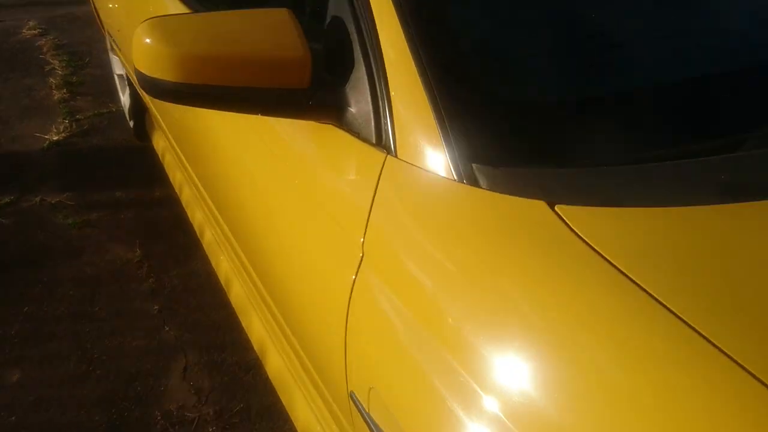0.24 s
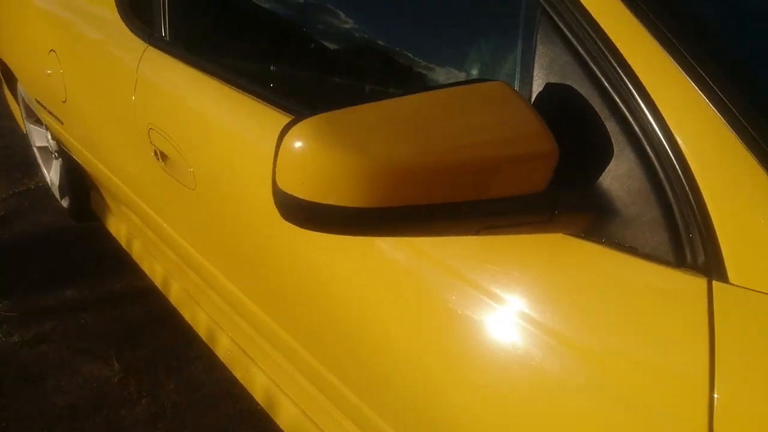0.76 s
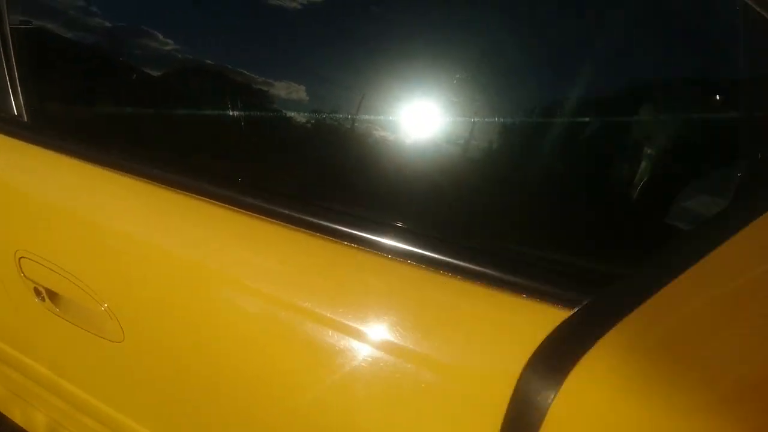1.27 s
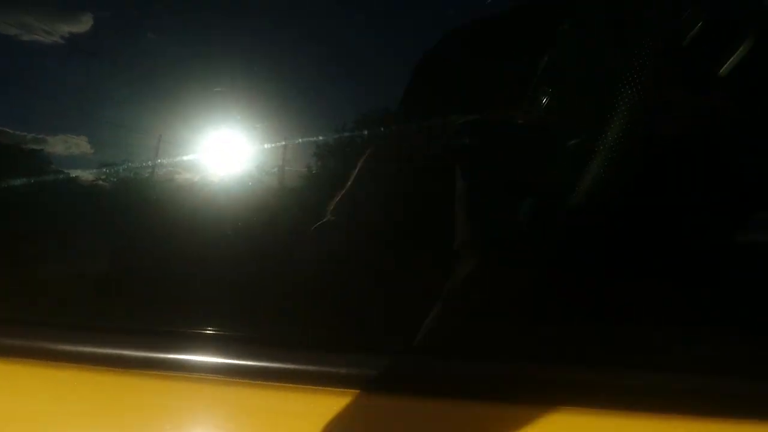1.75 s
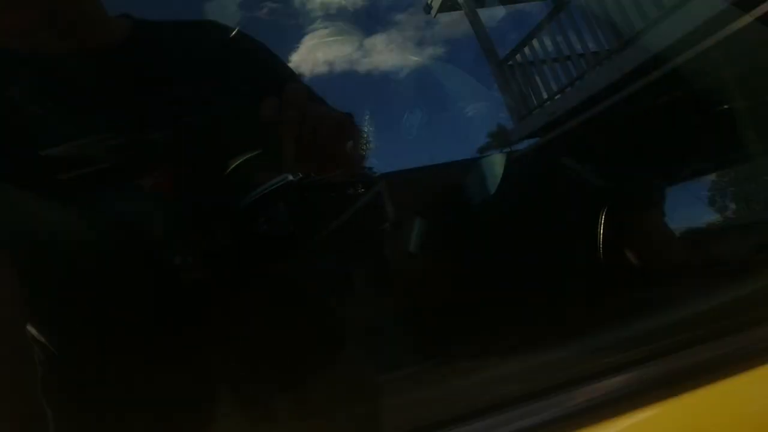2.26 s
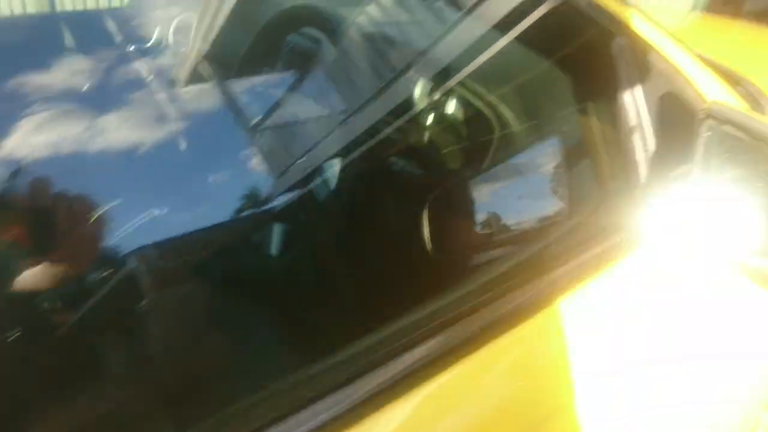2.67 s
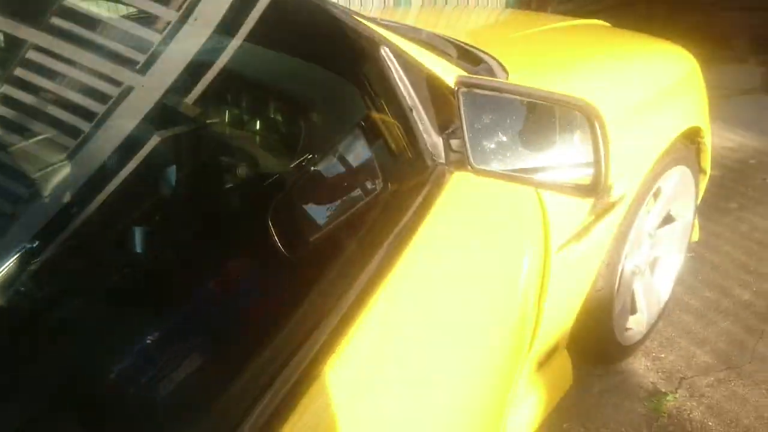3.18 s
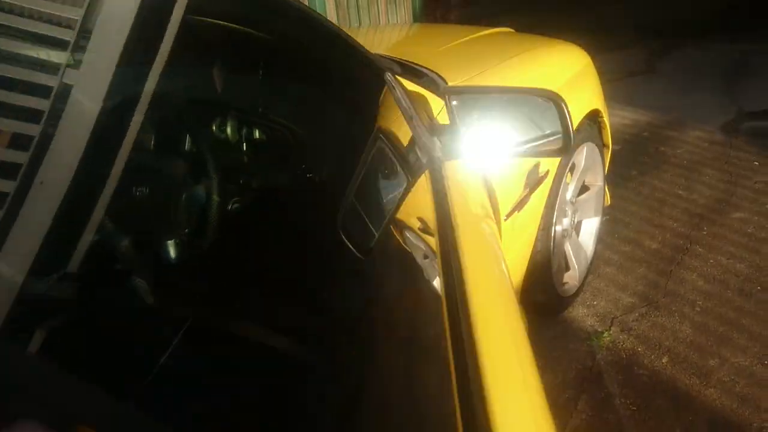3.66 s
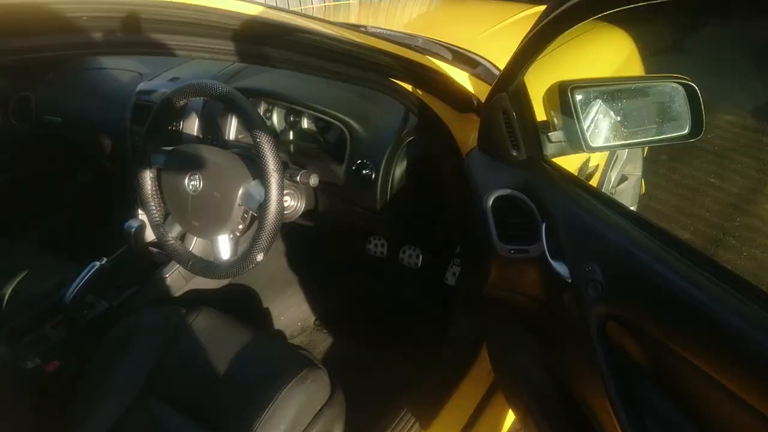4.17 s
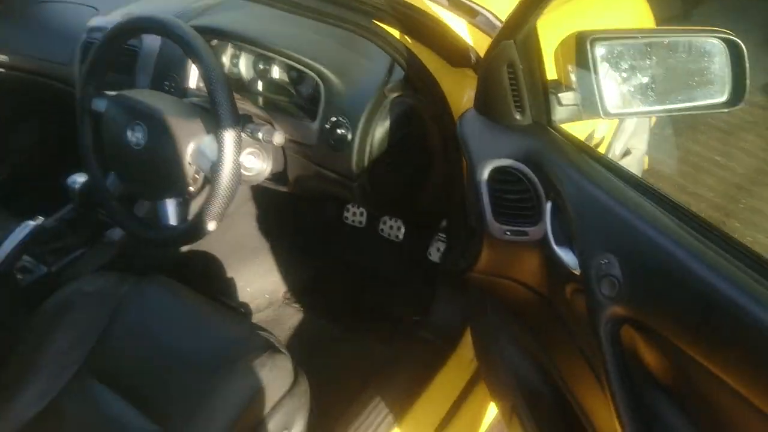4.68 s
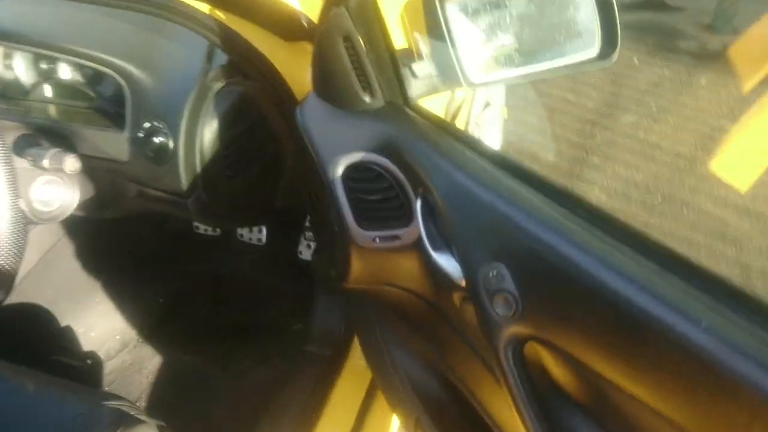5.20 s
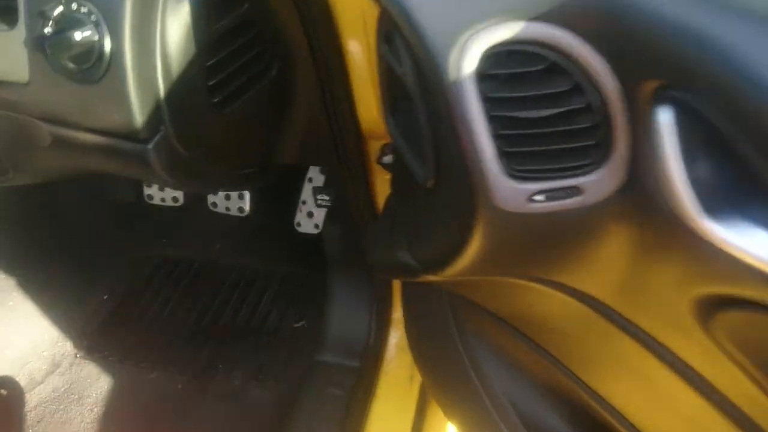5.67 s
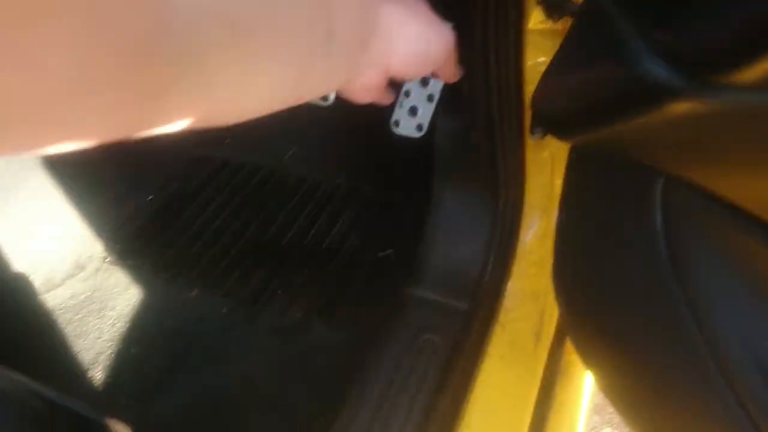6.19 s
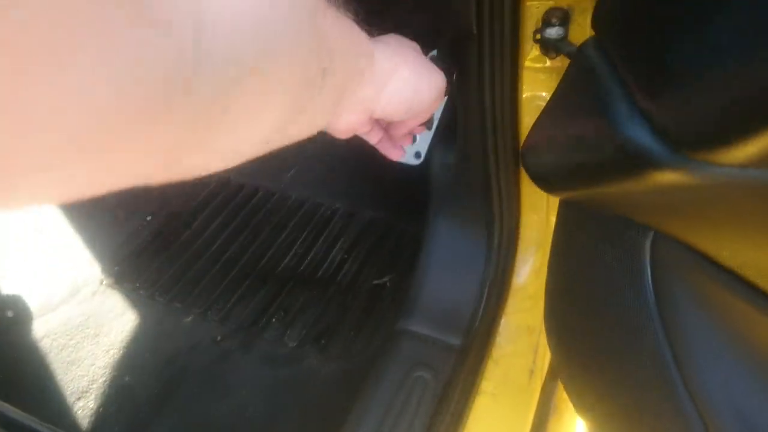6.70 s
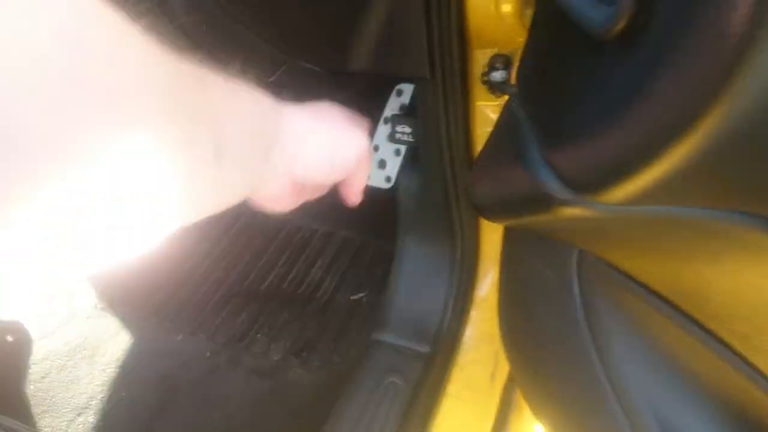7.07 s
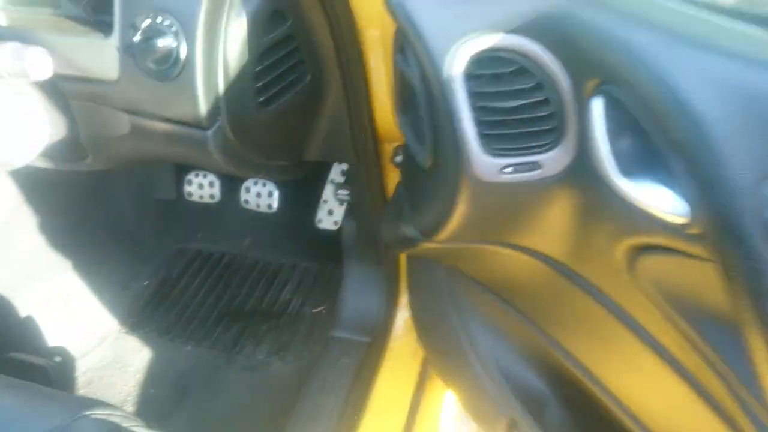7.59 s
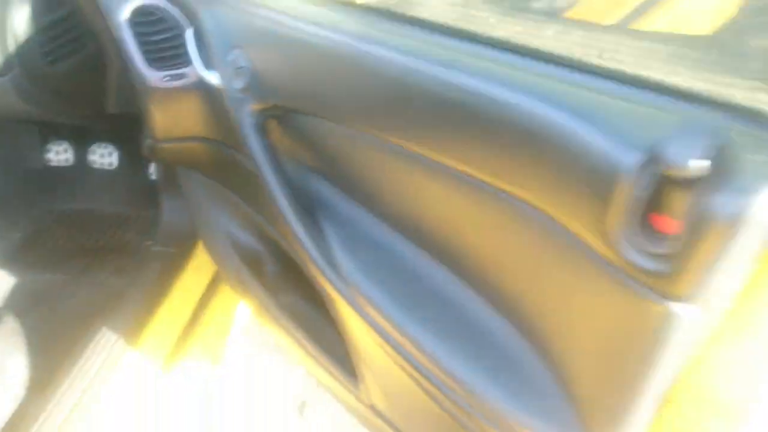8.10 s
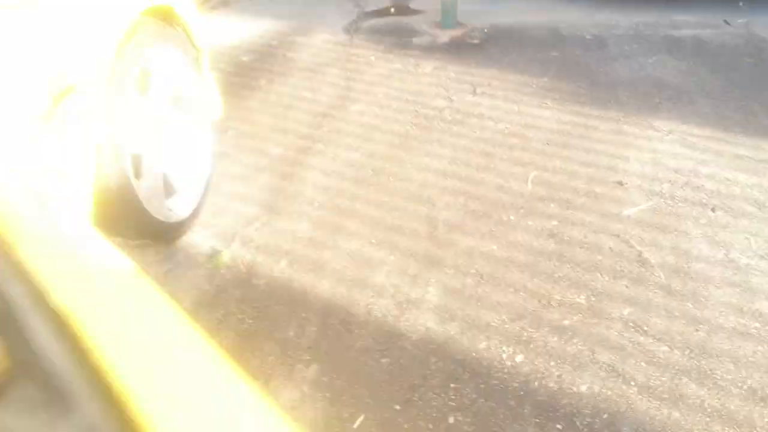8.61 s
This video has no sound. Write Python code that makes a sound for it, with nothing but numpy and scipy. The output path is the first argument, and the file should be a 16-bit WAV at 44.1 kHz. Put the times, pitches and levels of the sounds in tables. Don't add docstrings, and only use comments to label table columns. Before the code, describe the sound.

Faint cloth rustle and distant traffic, a car door unlatching with steel clunks and soft seal squeaks, later a footwell lever snapping and a louder catch crack.

```python
import sys
import numpy as np
from scipy import signal
from scipy.fft import rfft, irfft
from scipy.io import wavfile
from scipy.ndimage import uniform_filter1d

SR = 44100
rng = np.random.default_rng(int(sys.argv[2]) if len(sys.argv) > 2 else 0)


def waveform_to_disk(signal):
    frames = np.transpose(np.atleast_2d(signal))
    scaled = np.clip(frames, -1, 1) * 32767
    samples = np.round(scaled).astype(np.int16)
    wavfile.write(sys.argv[1], SR, samples)


def undo_db(level):
    steps = np.asarray(level, float) / 20
    return 10 ** steps


N = 390285


def evened(x):
    return x / np.sqrt(np.mean(x ** 2) + 1e-20)


def read(points, hz):
    f, value = np.transpose(points)
    return np.interp(np.log(hz + 1), np.log(f + 1), value)


def over_time(points):
    return np.interp(np.arange(N) / SR, *np.transpose(points))


def add(mix, s, sound):
    part = mix[:, round(s * SR):][:, :sound.shape[1]]
    part += sound[:, :part.shape[1]]


def panned(pan_db):
    return undo_db(np.array([pan_db / 2, -pan_db / 2]))


def coloured(x, tone):
    size = x.shape[-1]
    gain = undo_db(read(tone, np.fft.rfftfreq(size, 1 / SR)))
    return evened(irfft(rfft(x) * gain, size))


def pair(size, same):
    a, b = rng.standard_normal((2, size))
    same = np.clip(same, 0, 1)
    return np.array([a, same * a + np.sqrt(1 - same ** 2) * b])


def resonate(x, hz, width):
    turn = np.exp(2j * np.pi * np.cumsum(hz * np.ones(x.shape[-1])) / SR)
    r = np.exp(-np.pi * width / SR)
    return 2 * (turn * signal.lfilter([1 - r], [1, -r], x / turn)).real


def resonate_twice(x, hz, width):
    return resonate(resonate(x, hz, width), hz, width)


def rung(modes, t, spread):
    hz, db, t60 = np.transpose(modes)[:, :, None]
    detune, strength = spread * rng.standard_normal((2, len(modes), 1))
    level = undo_db(db + 30 * strength - 60 * t / t60)
    return -(level * np.sin(2 * np.pi * hz * (1 + detune) * t)).sum(0)


def dying(burst, t, t60, rise):
    shape = undo_db(-60 * t / t60) * np.minimum(t / rise, 1)
    return evened(burst * shape) * np.sqrt(np.mean(shape ** 2))


def ports(x, pan_db):
    paths = np.zeros(24)
    paths[rng.integers(0, 24, size=9)] = rng.choice([-1., 1.], size=9) / 3
    paths = evened(paths - paths.mean()) / 5
    treble = signal.sosfilt(signal.butter(2, 700, "high", fs=SR, output="sos"), x[1])
    side = 1.05 * np.convolve(treble, paths)[:len(treble)]
    return np.array([x[0] + side, x[0] - side]) * panned(pan_db)[:, None]


# (time [s], left over right [dB])
CAMERA_TURN = [
    (3.8, -6),
    (4.15, -4),
    (5.8, -7.5),
    (6.1, -2),
]


def facing(share):
    return panned(share * over_time(CAMERA_TURN))


# (frequency [Hz], level per Hz [dB])
AIR_TONE = [(15, -66), (25, -27), (42, -9.5), (64, -1), (97, -11), (134, -10.5), (236, -15), (270, -16.5),
            (363, -16), (560, -30), (1520, -38.5), (1700, -45), (5880, -39.5), (7710, -42), (16000, -45.5)]
# (frequency [Hz], likeness [0 to 1])
AIR_LIKENESS = [(60, 0.73), (180, 0.86), (550, 0.36), (1650, 0), (15000, 0)]


def air():
    frames, hz = N // 256 + 5, np.fft.rfftfreq(1024, 1 / SR)
    a, b, c, d, patches = rng.standard_normal((frames, 513, 5)).T
    patches = uniform_filter1d(patches, size=12, axis=0)
    patches = evened(uniform_filter1d(patches, size=14, axis=1))
    same = np.clip(read(AIR_LIKENESS, hz), -1, 1)[:, None]
    left = a + 1j * b
    z = np.array([left, same * left + np.sqrt(1 - same ** 2) * (c + 1j * d)])
    z *= undo_db(read(AIR_TONE, hz)[:, None] + 1.9 * patches)
    hush = signal.istft(z, nperseg=1024, noverlap=768)[1][:, :N]
    return undo_db(-55.0) * evened(hush) * facing(0.15)


# (time [s], level [dB])
TRAFFIC_SWELL = [(0.0, -55), (1.1, -52.5), (1.62, -61.5), (2.2, -50), (3.57, -54), (4.19, -56.5),
                 (4.58, -47.5), (4.9, -59), (5.3, -51.5), (5.72, -54), (6.5, -54), (7.76, -61.5),
                 (8.09, -49), (8.4, -66), (8.85, -52)]
# (frequency [Hz], level per Hz [dB])
RUMBLE_COLOUR = [(30, -13.5), (45, -5.5), (65, 7.5), (110, -5.5), (200, -12.5), (400, -25), (600, -62.5)]
# (time [s], level [dB])
ROAR_SWELL = [
    (0.0, -60),
    (3.5, -59),
    (4.15, -51.5),
    (4.65, -60.5),
    (5.3, -54.5),
    (5.8, -67),
    (6.6, -73),
    (7.7, -62.5),
]
# (frequency [Hz], level per Hz [dB])
ROAR_COLOUR = [(110, -39.5), (170, -3), (380, 0.5), (520, -10.5), (1100, -17), (1500, -64.5)]


def traffic():
    low = coloured(pair(N, 0.9), RUMBLE_COLOUR) * undo_db(over_time(TRAFFIC_SWELL) - 1.0)
    roar = coloured(pair(N, 0.59), ROAR_COLOUR) * undo_db(over_time(ROAR_SWELL) - 4.5)
    return (low + roar) * facing(1.0)


# (start [s], peak [s], end [s], peak level [dB], hollow band against it [dB])
STEPS_AND_CLOTH = [(0.0, 0.08, 0.33, -66.5, 5.5), (0.55, 0.692, 0.87, -63, -2),
                   (1.013, 1.275, 1.53, -61.5, 1), (1.805, 2.01, 2.1, -56.5, 2),
                   (2.303, 2.315, 2.35, -56.5, 7.5), (2.56, 2.59, 2.7, -60.5, 13),
                   (2.66, 2.836, 3.41, -57.5, 10), (4.488, 4.554, 7.1, -79, -20),
                   (4.837, 5.083, 5.47, -60, -6.5), (6.99, 7.031, 7.1, -56, 8.5),
                   (7.195, 7.288, 7.3, -54.5, -9.5), (7.9, 8.05, 8.27, -57.5, 0.5),
                   (8.479, 8.75, 8.8, -56, 4.5)]
# (start [s], end [s], level [dB], change by the end [dB], hollow band against it [dB])
SEAL_DRAGS = [(2.017, 2.3, -70.5, -5.5, 6.5), (2.443, 2.58, -60, -15, 14), (2.95, 3.235, -71, -2, -17),
              (3.511, 3.6, -60, -15, 1), (3.602, 3.91, -74, 5, 4), (3.91, 4.16, -58.5, -2, -1),
              (4.162, 4.21, -64, 5, -3), (4.152, 4.262, -65, -5, 3), (4.256, 4.385, -61.5, -3, -3),
              (5.424, 6.32, -76, 9.5, -15), (6.753, 7.033, -58.5, -20.5, 12), (7.05, 7.25, -60, -12.5, 9.5),
              (7.276, 7.55, -69, -3, 0.5), (7.505, 7.98, -62, -8, -2), (8.74, 8.851, -65, -10, 7)]


def motion():
    still_db, reach_db, grip_s = -71.5, -26.5, 0.0078
    t = np.arange(N) / SR
    gains = np.ones((2, N)) * undo_db(np.array([[still_db], [still_db + 2.5]]))
    for start, peak, end, db, hollow_db in STEPS_AND_CLOTH:
        now = t[round(start * SR):round(end * SR)]
        swell_db = np.interp(now, [start, peak, end], [reach_db, 0, reach_db])
        add(gains, start, undo_db(db + swell_db + np.array([[0], [hollow_db]])))
    for start, end, db, sag_db, hollow_db in SEAL_DRAGS:
        now = t[round(start * SR):round(end * SR)]
        grip = np.clip(np.minimum(now - start, end - now) / grip_s, 0, 1)
        sagging_db = sag_db * (now - start) / (end - start)
        add(gains, start, grip * undo_db(db + sagging_db + np.array([[0], [hollow_db]])))
    return gains


# (frequency [Hz], level per Hz [dB])
FIZZ_TONE = [(1410, -38.5), (2400, -16.5), (2770, -8), (3660, -4), (5180, -5), (5980, -0.5), (7010, -2),
             (8210, -22), (13900, -17.5), (16000, -29)]


def rustle():
    fizz_gain, hollow_gain = motion()
    slips = undo_db(1.3 * np.minimum(rng.exponential(1, N), 5)) * (rng.random(N) < 900 / SR)
    grit = undo_db(5.4 * np.minimum(rng.exponential(1, N), 3)) * (rng.random(N) < 25 / SR)
    grit = signal.lfilter([1], [1, -np.exp(-1 / 110)], grit)
    clumps = 3.3 + evened(uniform_filter1d(slips, size=90)) + 0.72 * grit
    rub = pair(N, 0.087) * evened(clumps)
    fizz = coloured(rub, FIZZ_TONE)
    hollow = evened(resonate_twice(rub, 1490, 1780))
    return undo_db(-2.5) * (fizz_gain * fizz + hollow_gain * undo_db(-3.5) * hollow) * panned(-4.0)[:, None]


# (frequency [Hz], level per Hz [dB])
SNAP_TONE = [(700, -7.5), (1300, -9), (2500, -2), (5000, -3), (6500, -1.5), (8000, -18.5), (16000, -27)]
# (pitch [Hz], left over right [dB])
SIDE_BY_PITCH = [(1400, -11.5), (3200, -2.5), (6000, -1)]


def tick(s, db, hz, snap, width):
    t = np.arange(3000) / SR
    burst = pair(len(t), 0.88)
    broad = dying(coloured(burst, SNAP_TONE), t, 0.023, 0.00041)
    ring = dying(resonate_twice(burst, hz, width), t, 0.037, 0.00063)
    sound = snap * broad + (1.3 - snap) * ring
    return s, ports(undo_db(db - 9.0) * sound, read(SIDE_BY_PITCH, hz))


# (time [s], peak level [dB], pitch [Hz])
SMALL_PARTS = [(0.066, -56, 3514), (0.0972, -54, 6200), (0.133, -55, 3400), (0.198, -47.5, 3400),
               (0.2086, -44, 6030), (0.3556, -54, 6000), (0.5097, -56, 6640), (0.6882, -48, 3280),
               (1.891, -42.5, 600), (1.945, -48, 1500), (2.152, -50.5, 5100), (2.271, -49, 5000),
               (2.4321, -19.5, 6000), (2.433, -27, 4470), (2.9103, -17, 6050), (2.911, -22, 3400),
               (3.207, -57, 4540), (3.224, -51.5, 4380), (3.512, -49, 4300), (4.372, -55, 4600),
               (4.87, -56, 4520), (2.5893, -48, 6260), (8.635, -45.5, 1350), (2.4117, -20, 1900),
               (7.2694, -38, 1480), (6.1229, -46.5, 1700), (6.009, -48, 1600), (6.011, -52, 5600),
               (7.254, -35.5, 5600), (7.271, -43, 4960), (7.323, -41.5, 1610), (7.4625, -56.5, 4360),
               (7.5133, -55, 3920), (7.73, -55, 3500), (7.832, -43, 546), (7.927, -54.5, 2980),
               (8.0154, -46, 4200), (8.022, -47, 1250), (8.06, -55.5, 2200), (8.2295, -56, 1180),
               (8.31, -52.5, 5630), (6.293, -44, 5950)]


def small_parts(mix):
    for s, db, hz in SMALL_PARTS:
        add(mix, *tick(s, db, hz, snap=0.37, width=720))


# (time [s], peak level [dB], pitch [Hz])
SECOND_VOICES = [(5.5655, -40, 3900), (5.485, -50.5, 2900), (6.7292, -26.5, 3300), (6.7305, -22.5, 6200),
                 (6.878, -37.5, 3200), (3.839, -52, 2400), (3.839, -53, 5400), (2.152, -56, 2600),
                 (8.231, -57, 4500), (8.311, -58, 3400), (0.199, -52, 1800), (3.1, -41, 1450),
                 (7.016, -40, 945), (7.189, -48, 1130), (2.4125, -27, 6200), (2.442, -31, 6500),
                 (7.287, -49, 4800)]


def second_voices(mix):
    for s, db, hz in SECOND_VOICES:
        add(mix, *tick(s, db, hz, snap=0.27, width=860))


# (time [s], peak level [dB], pitch [Hz])
GRIT_AND_HANDLE = [(0.7072, -41.5, 6230), (1.1772, -48, 3480), (1.2403, -44.5, 6240), (1.87, -43.5, 5930),
                   (1.981, -39, 2400), (1.995, -31, 3120), (2.0044, -33, 3120), (2.018, -38, 3480),
                   (2.049, -41.5, 2400), (2.312, -42, 6050), (2.3845, -42.5, 5000), (2.589, -38, 1310),
                   (2.822, -34, 1940), (2.837, -28, 2010), (2.8478, -31, 6100), (2.846, -32, 2300),
                   (2.864, -30, 1890), (3.406, -45.5, 5100), (3.84, -46, 1380), (4.553, -44, 4300),
                   (4.7611, -47, 4700), (8.252, -48, 4080), (8.7197, -39.5, 2505), (8.738, -29, 2060)]


def grit_and_handle(mix):
    for s, db, hz in GRIT_AND_HANDLE:
        add(mix, *tick(s, db, hz, snap=0.85, width=1240))


def squeak(start, end, first_hz, last_hz, width, db):
    size = round((end - start) * SR)
    waver = evened(uniform_filter1d(rng.standard_normal(size), size=600))
    hz = np.linspace(first_hz, last_hz, size) + min(width / 4, 30) * waver
    rub = evened(resonate_twice(pair(size, 0.23), hz, width))
    grip = signal.windows.tukey(size, .15)
    return start, undo_db(db + 2.0 * waver[::-1]) * rub * grip * panned(-10.5)[:, None]


# (start [s], end [s], first pitch [Hz], last pitch [Hz], level [dB])
CHIRPS = [
    (1.07, 1.165, 2830, 3150, -74.5),
    (1.055, 1.14, 5480, 6100, -77),
    (7.905, 7.932, 5800, 5240, -73),
]


def chirps(mix):
    for start, end, first_hz, last_hz, db in CHIRPS:
        add(mix, *squeak(start, end, first_hz, last_hz, 30, db))


# (start [s], end [s], centre [Hz], width [Hz], level [dB])
BREATHY_RASPS = [(2.93, 2.985, 3400, 500, -56), (3.0, 3.235, 5900, 610, -72), (3.05, 3.2, 4400, 640, -72),
                 (3.278, 3.296, 6150, 150, -70), (2.175, 2.245, 2320, 400, -75),
                 (1.868, 1.91, 1440, 700, -68), (1.875, 1.93, 550, 410, -66),
                 (3.91, 4.05, 1800, 900, -66.5), (4.06, 4.16, 1400, 1100, -67),
                 (4.06, 4.15, 4200, 1000, -67.5), (3.7, 3.9, 155, 60, -64.5), (1.3, 2.4, 158, 71, -65.5),
                 (5.52, 5.56, 6000, 900, -67), (5.86, 5.99, 6200, 900, -71.5), (7.55, 8.5, 700, 520, -75),
                 (7.24, 7.295, 10000, 6000, -70), (2.445, 2.49, 365, 50, -46)]


def rasps(mix):
    for start, end, hz, width, db in BREATHY_RASPS:
        add(mix, *squeak(start, end, hz, hz, width, db))


# (start [s], end [s], centre [Hz], width [Hz], level [dB])
MORE_SCUFFS = [(1.864, 1.953, 550, 3100, -66), (2.8, 2.909, 1700, 4500, -53),
               (2.993, 3.241, 3800, 1300, -68.5), (3.03, 3.235, 4800, 320, -77),
               (6.49, 6.54, 1200, 1600, -70), (4.27, 4.38, 4500, 600, -71), (5.17, 5.4, 1260, 300, -81),
               (2.46, 2.6, 2230, 430, -62.5), (2.82, 2.875, 2000, 600, -50.5),
               (2.997, 3.237, 1500, 650, -67.5), (3.511, 3.567, 4200, 1300, -67.5),
               (3.9, 4.04, 3550, 2200, -65), (4.168, 4.231, 1410, 360, -60), (4.238, 4.389, 1400, 770, -68),
               (5.283, 5.337, 5940, 402, -68.5), (5.148, 5.419, 885, 650, -74),
               (5.032, 5.15, 11100, 11000, -70), (6.075, 6.104, 2800, 4100, -62.5), ]


def scuffs(mix):
    for start, end, hz, width, db in MORE_SCUFFS:
        add(mix, *squeak(start, end, hz, hz, width, db))


# (time [s], level [dB])
SHUDDERS = [
    [(2.0, -64), (2.276, -70), (2.472, -30), (2.668, -48.5), (2.886, -49), (3.056, -37.5), (3.354, -76),
     (3.6, -66)],
    [(6.74, -53), (6.79, -54), (6.91, -23), (6.98, -33.5), (7.08, -28), (7.316, -34.5), (7.518, -41),
     (7.75, -64.5)],
]
# (pitch [Hz], level [dB], time to die by 60 dB [s])
DOOR_PANELS = [(125.6, -19.5, 0.7), (163, -2.5, 0.19), (216.2, -8, 0.283), (300, -12, 0.21),
               (382, -11, 0.2), (434.5, -14.5, 0.23), (490.6, -19.5, 0.14), (634, -20.5, 0.17),
               (696, -21.5, 0.21)]
# (pitch [Hz], level [dB], time to die by 60 dB [s])
BODY_PANELS = [(57, -11, 0.17), (90, -3.5, 0.44), (122.4, -6, 0.36), (157.2, 4, 0.16), (182.6, -5.5, 0.53),
               (239.3, -14, 0.65), (266.9, -3.5, 0.28), (308, -12.5, 0.39), (340.3, -11, 0.33),
               (391, -20, 0.24), (555, -23, 0.41), (629, -23.5, 0.23)]


def shudder(rows, panels, width, boom_db):
    s, db = np.transpose(rows)
    t = np.arange(s[0], s[-1], 1 / SR)
    knocks = pair(len(t), 0.89)
    hum = sum(undo_db(level_db) * resonate_twice(knocks, hz, width) for hz, level_db, _ in panels)
    boom = undo_db(boom_db) * coloured(knocks, RUMBLE_COLOUR)
    level = undo_db(np.interp(t, s, db) - 9.0) * signal.windows.tukey(len(t), .05)
    return s[0], level * (evened(hum) + boom) * panned(-4.5)[:, None]


def shudders(mix):
    add(mix, *shudder(SHUDDERS[0], DOOR_PANELS, width=62, boom_db=-6.0))
    add(mix, *shudder(SHUDDERS[1], BODY_PANELS, width=51, boom_db=1.0))


def blow(row, panels):
    s, db, hz, t60, panels_db = row
    t = np.arange(30000) / SR
    nearest = rung([(hz, 0, t60), (1.5 * hz, -14, t60)], t, 0)
    sound = nearest + undo_db(panels_db) * rung(panels, t, 0.037)
    return s, undo_db(db) * (1 - np.exp(-t / 0.003)) * sound * panned(-5.5)[:, None]


# (time [s], peak level [dB], nearest panel's pitch [Hz],
# its time to die by 60 dB [s], other panels [dB])
DOOR_THUMPS = [(2.05, -29.5, 187.4, 0.19, -15.5), (2.155, -36, 184.2, 0.32, -8.5),
               (2.313, -34.5, 144, 0.15, -4.5), (2.4071, -13, 181, 0.077, -12),
               (2.441, -18.5, 224, 0.063, -7), (2.45, -16.5, 206, 0.11, -8),
               (2.9125, -10, 184.5, 0.15, -4.5), (3.308, -30.5, 133.5, 0.12, -7),
               (3.46, -36.5, 226, 0.1, -6), (5.092, -45, 176, 0.11, 3), (6.305, -32, 270, 0.038, -31),
               (6.54, -38.5, 300, 0.054, -8)]


def door_thumps(mix):
    for row in DOOR_THUMPS:
        add(mix, *blow(row, DOOR_PANELS))


# (time [s], peak level [dB], pitch [Hz], time to die by 60 dB [s])
DOOR_SWAYS = [
    (2.071, -30.5, 115.4, 0.3),
    (2.179, -27, 116.5, 0.17),
    (2.407, -19, 73.7, 0.23),
    (5.389, -23.5, 63, 0.09),
]


def door_sways(mix):
    t = np.arange(30000) / SR
    for s, db, hz, t60 in DOOR_SWAYS:
        swell = undo_db(db) * (1 - np.exp(-t * hz))
        add(mix, s, swell * rung([(hz, 0, t60)], t, 0) * panned(-3.5)[:, None])


def crack(row, tone, ring, ring_db, rattle_t60, pan_db):
    s, db, t60, low_db, rattle_db = row
    t = np.arange(16000) / SR
    tilt = [(2300, low_db), (3300, 0.0025)]
    burst = coloured(coloured(pair(len(t), 0.97), tone), tilt)
    dull = coloured(np.roll(burst, 999), [(1500, 15.0), (2500, 6.5), (5000, -7), (8000, -12.5)])
    chatter = undo_db(3.5 * evened(uniform_filter1d(rng.standard_normal(len(t)), size=120)))
    snap = dying(burst * chatter ** 0.31, t, t60, 0.0024)
    rattle = undo_db(rattle_db) * dying(dull * chatter, t, rattle_t60, 0.0081)
    sound = snap + rattle + undo_db(ring_db) * rung(ring, t, 0.021)
    return s, ports(undo_db(db + max(low_db, 0) - 7.5) * sound, pan_db)


# (time [s], peak level [dB], time to die by 60 dB [s],
# lower band against it [dB], rattle after it [dB])
LATCH_CRACKS = [
    (2.406, -29, 0.025, -17, -13),
    (2.4114, -24.5, 0.061, 7.5, -8),
    (2.4323, -19.5, 0.025, -7, -10),
    (2.4437, -31.5, 0.068, 0.5, -2.5),
    (2.909, -18.5, 0.034, 4.5, -8),
    (2.9246, -25, 0.029, -11.5, -7),
    (2.934, -44.5, 0.05, 11, -6),
    (2.95, -53, 0.037, 6, -10),
]
# (frequency [Hz], level per Hz [dB])
LATCH_COLOUR = [(240, -75), (400, -8), (994, -13), (1250, -9.5), (1460, -20.5), (1900, -5.5), (2670, -13),
                (3810, -17.5), (4380, -13), (4800, -19), (5960, -4.5), (7990, -24), (14400, -33),
                (16000, -31)]
# (pitch [Hz], level [dB], time to die by 60 dB [s])
LATCH_PARTS = [(1130, -27, 0.16), (1785, -29, 0.061), (2200, 3, 0.075), (3400, -8.5, 0.2),
               (4400, -1, 0.022), (5770, -21, 0.022)]


def latch(mix):
    for row in LATCH_CRACKS:
        add(mix, *crack(row, LATCH_COLOUR, LATCH_PARTS, ring_db=-15.5, rattle_t60=0.21, pan_db=-5.5))


# (start [s], end [s], first pitch [Hz], last pitch [Hz], level [dB])
SEAL_SQUEAKS = [(2.498, 2.751, 1290, 1190, -67.5), (3.508, 3.599, 1680, 1620, -66),
                (3.574, 3.731, 1850, 2100, -73.5), (3.625, 3.728, 1470, 1740, -73),
                (3.904, 3.994, 2070, 2240, -70), (4.03, 4.153, 3700, 3680, -67),
                (3.94, 4.03, 1680, 1880, -67), (3.98, 4.04, 1400, 1640, -68), (4.08, 4.14, 2100, 2100, -67),
                (3.84, 3.9, 1430, 1300, -72), (3.835, 3.86, 920, 1020, -66), (3.72, 3.8, 3800, 4800, -81),
                (3.08, 3.19, 4150, 4300, -73), (3.06, 3.2, 1640, 1720, -66), (2.99, 3.12, 4000, 6300, -79),
                (3.235, 3.27, 6250, 6700, -72), (4.23, 4.33, 1300, 1700, -69),
                (4.064, 4.151, 1620, 1740, -61.5)]


def seal_squeaks(mix):
    for start, end, first_hz, last_hz, db in SEAL_SQUEAKS:
        add(mix, *squeak(start, end, first_hz, last_hz, 130, db))


# (time [s], peak level [dB], nearest panel's pitch [Hz], # its time
# to die by 60 dB [s], other panels [dB])
MORE_BLOWS = [
    (2.937, -21, 150, 0.11, -4),
    (6.738, -17, 149, .12, -15),
    (7.046, -22, 390, .07, -20),
    (2.938, -21.5, 313, .09, -20),
    (2.965, -23, 236, .14, -20),
    (3.035, -31, 129.6, .15, -18),
]


def more_blows(mix):
    for row in MORE_BLOWS:
        add(mix, *blow(row, DOOR_PANELS))


# (time [s], peak level [dB], pitch [Hz])
FOOTWELL_CREAKS = [(5.3727, -52, 1490), (5.459, -46, 1860), (5.485, -45.5, 6940), (5.5655, -36.5, 1940),
                   (5.998, -43, 6030), (6.0225, -38, 2080), (6.1218, -41, 3800), (6.143, -48.5, 1490),
                   (6.173, -47.5, 3920), (6.221, -44.5, 6640), (6.2527, -42, 6740), (6.294, -45, 3020),
                   (7.2693, -42, 1450), (7.8471, -45.5, 1700)]


def footwell(mix):
    for s, db, hz in FOOTWELL_CREAKS:
        add(mix, *tick(s, db, hz, snap=0.85, width=1240))


# (time [s], peak level [dB],
# time to die by 60 dB [s], lower band against it [dB], rattle after it [dB])
LEVER_CRACKS = [
    (6.7287, -27.5, 0.13, -19.5, -9.5),
    (6.734, -29.5, 0.096, 6, -7),
    (6.8633, -39, 0.076, 7.5, -8),
    (6.8698, -38.5, 0.15, 8, -11),
    (6.881, -44.5, 0.09, 5.5, -9.5),
]
# (frequency [Hz], level per Hz [dB])
LEVER_COLOUR = [(240, -32), (400, -4), (1040, -2.5), (1200, -4.5), (1440, -5.5), (2590, -14), (6150, -14),
                (8240, -32), (16000, -30.5)]
# (pitch [Hz], level [dB], time to die by 60 dB [s])
LEVER_PARTS = [(600, 1, .06), (990, 6.5, 0.056), (1390, -13, .05), (1940, -1.5, .1), (3360, -2, .04),
               (5060, -16, .05), (6500, -14, 0.027)]


def lever(mix):
    for row in LEVER_CRACKS:
        add(mix, *crack(row, LEVER_COLOUR, LEVER_PARTS, ring_db=-10.0, rattle_t60=0.33, pan_db=-5.5))


# (time [s], peak level [dB], nearest panel's pitch [Hz],
# its time to die by 60 dB [s], other panels [dB])
BODY_THUMPS = [
    (6.734, -10.5, 83, 0.1, -7.5),
    (6.756, -18, 98.2, 0.11, -5.5),
    (6.79, -19, 77.6, 0.26, -1.5),
    (6.865, -26.5, 135, 0.13, 1),
    (7.002, -20, 92, 0.091, -7),
    (7.047, -24.5, 164.6, 0.095, 3.5),
    (7.11, -30.5, 156, 0.09, -0.5),
    (7.179, -24.5, 76.4, 0.13, -6.5),
    (7.399, -28.5, 85.8, 0.26, -21.5),
]


def body_thumps(mix):
    for row in BODY_THUMPS:
        add(mix, *blow(row, BODY_PANELS))


# (time [s], peak level [dB], time to die by 60 dB [s],
# lower band against it [dB], rattle after it [dB])
CATCH_CRACKS = [
    (7.038, -35.5, 0.043, 7, -17.5),
    (7.0477, -2.5, 0.074, -2, -29),
    (7.066, -23, 0.1, 6.5, -25),
]
# (frequency [Hz], level per Hz [dB])
CATCH_COLOUR = [(240, -40), (400, 3.5), (676, -12), (979, -7), (1140, -1), (1290, -7.5), (1870, -8),
                (2290, -10), (2880, -10), (4950, -18.5), (6640, -16.5), (8370, -33.5), (15300, -37),
                (16000, -47.5)]
# (pitch [Hz], level [dB], time to die by 60 dB [s])
CATCH_PARTS = [(1113, -25.5, 0.19), (1630, -28, 0.14), (1970, 2.5, 0.029), (2850, -2.5, 0.096),
               (4200, -1.5, 0.055), (5630, -21.5, 0.077), (6471, -18, 0.09)]


def catch(mix):
    for row in CATCH_CRACKS:
        add(mix, *crack(row, CATCH_COLOUR, CATCH_PARTS, ring_db=-12.5, rattle_t60=0.31, pan_db=-5.0))


def scene():
    mix = air() + traffic() + rustle()
    for source in (small_parts, second_voices, grit_and_handle, chirps, rasps, scuffs, shudders,
                   door_thumps, door_sways, latch, seal_squeaks, more_blows, footwell, lever,
                   body_thumps, catch):
        source(mix)
    return mix


def band_limit(x):
    return signal.sosfilt(signal.butter(12, 15900, fs=SR, output="sos"), x)


def record(dry):
    cut = signal.sosfilt(signal.butter(4, 45, "high", fs=SR, output="sos"), dry)
    top_cut = signal.firwin(255, 15900, window=("kaiser", 8), fs=SR)
    cut = signal.oaconvolve(cut, top_cut[None], "same")
    finished = 0.95 * np.tanh(cut / 0.87) - .0012
    return band_limit(finished)


dry = scene()
out = record(dry)
waveform_to_disk(out)
```